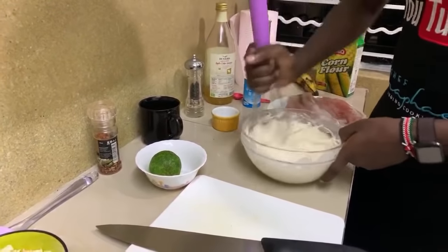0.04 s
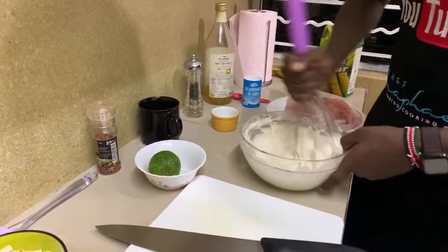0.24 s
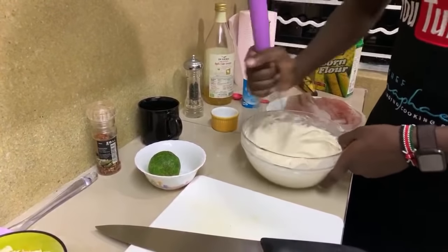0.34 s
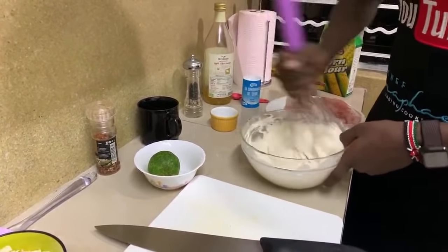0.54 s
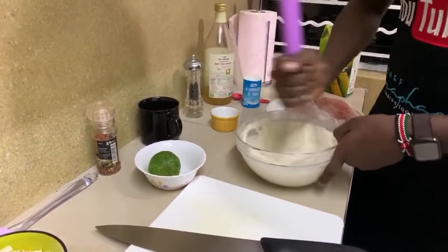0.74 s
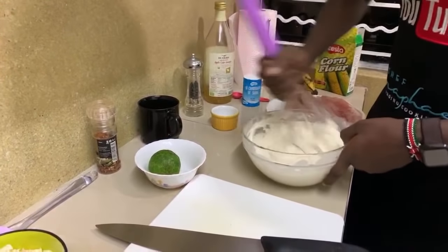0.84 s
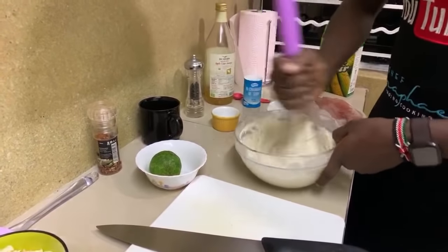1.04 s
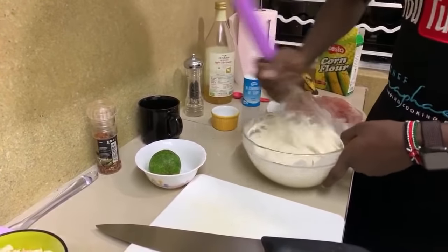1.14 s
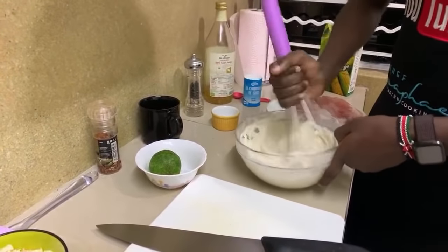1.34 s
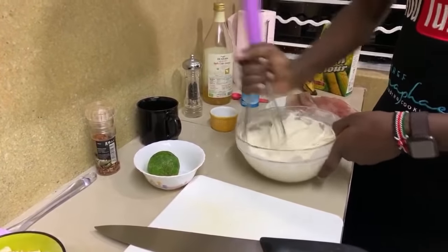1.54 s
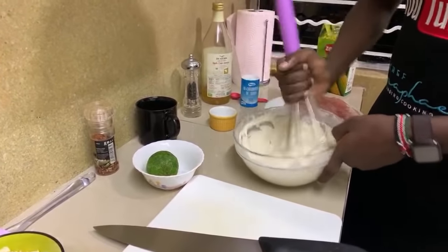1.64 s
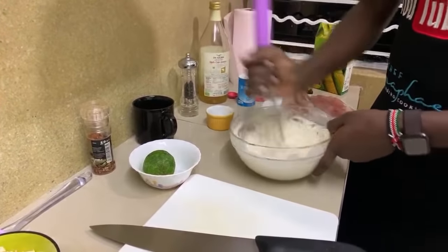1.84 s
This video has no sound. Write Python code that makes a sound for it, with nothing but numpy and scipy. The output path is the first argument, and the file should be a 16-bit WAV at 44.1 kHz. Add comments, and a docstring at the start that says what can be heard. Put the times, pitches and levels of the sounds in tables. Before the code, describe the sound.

Whisking thick batter by hand: wires clink on glass, wet squelches, one hard bowl knock early

```python
"""In a small hard-walled kitchen, close to the microphone, a wire whisk beats thick batter in a glass bowl.
The bowl is held by hand on the counter: it knocks (once hard), bumps and rumbles as pulses, rings and noise.
Wires click and scrape on the glass as damped modes and noisy slips. The batter squelches and crackles as
filtered grains that follow the drag. Short damped snaps make small pops and sharpen some wire clicks.
A few dry ticks, a faint steady background, and the kitchen's echoes and tail complete the place."""
import sys
import numpy as np
from scipy import signal
from scipy.io import wavfile

SR = 44100
rng = np.random.default_rng(int(sys.argv[2]) if len(sys.argv) > 2 else 0)


def unload_audio(sound):
    """Save the sound as a 16-bit wav file, at the path given as the first command line argument."""
    columns = np.transpose(np.atleast_2d(sound))
    # keep every value between -1 and 1, then stretch to whole-number steps
    steps = np.round(np.clip(columns, -1, 1) * 32767)
    wavfile.write(sys.argv[1], SR, steps.astype(np.int16))


N = 83790  # length [samples], 1.9 s
REF_S = 0.01  # a hit at 0 dB has the energy of this many seconds at rms 1


def amp(db):
    """Decibels to gain."""
    return 10 ** (np.asarray(db) / 20)


def read(points, hz):
    """Reads a (frequency, value) table on a log-frequency axis."""
    f, value = np.transpose(points)
    return np.interp(np.log(hz + 1), np.log(f + 1), value)


def evened(x):
    """Scales to rms 1."""
    return x / np.sqrt(np.mean(x ** 2) + 1e-20)


def sized(x):
    """Gives a hit the energy of REF_S seconds at rms 1."""
    return x * np.sqrt(REF_S * SR / (np.sum(x ** 2) + 1e-20))


def add(mix, s, sound):
    """Mixes a sound in at a time in seconds, in place."""
    part = mix[max(round(s * SR), 0):][:len(sound)]
    part += sound[:len(part)]


def pulse(colour, tilt_db=0, size=4096):
    """A minimum-phase pulse with the given spectrum, tilted in dB per octave above 1 kHz."""
    hz = abs(np.fft.fftfreq(size, 1 / SR))
    octaves = np.log2(np.maximum(hz / 1000, 1))
    log_gain = np.log(amp(read(colour, hz) + tilt_db * octaves))
    # The Hilbert transform of the log gain supplies the phase of a causal pulse
    spectrum = np.exp(np.conj(signal.hilbert(log_gain)))
    return np.fft.ifft(spectrum).real[:size // 2]


def through(x, response):
    """Convolves and keeps the length."""
    return signal.fftconvolve(x, response)[:len(x)]


def dying(t, t60):
    """Exponential decay, 60 dB down after t60 seconds."""
    return np.exp(-np.log(1000) * t / t60)


def ring(modes, scatter_db):
    """Sum of damped sines, each made louder or softer by its own scatter."""
    t = np.arange(SR // 2) / SR
    total = np.zeros(len(t))
    for (hz, db, t60), shift_db in zip(modes, scatter_db):
        total += amp(db + shift_db) * dying(t, t60) * np.sin(2 * np.pi * hz * t)
    return sized(total)


def blips(table, rise_s):
    """One damped resonance per row (time, frequency, level, t60), with a soft start."""
    out = np.zeros(N)
    t = np.arange(SR // 2) / SR
    rise = 1 - np.exp(-(t / rise_s) ** 2)
    for s, hz, db, t60 in table:
        tone = rise * dying(t, t60) * np.sin(2 * np.pi * hz * t)
        add(out, s, amp(db) * sized(tone))
    return out


def grains(colour):
    """A dense patter of tiny snaps of uneven size and random sign, coloured and scaled to rms 1."""
    per_second, spread_db = 1400, 5
    sizes = amp(spread_db * np.minimum(rng.exponential(1, N), 4)) * rng.choice([-1, 1], N)
    patter = sizes * (rng.random(N) < per_second / SR)
    return evened(through(patter, pulse(colour)))


def background():
    """Faint steady noise with a fixed spectrum."""
    # Background colour: (frequency [Hz], relative level [dB])
    floor_colour = [(20, -12), (50, -12), (100, -8), (180, -22), (300, -14), (700, -18), (2000, -28.5),
                    (5000, -38), (9000, -46), (15500, -47)]
    level_db = -55
    return amp(level_db) * evened(through(rng.standard_normal(N), pulse(floor_colour)))


def kitchen(x):
    """Echoes off counter and wall, a quick scatter off the jars and a longer tail."""
    # Near surfaces: (delay [s], gain)
    echoes = [(.0016, 0.1), (.0052, 0.05), (.0094, 0.14), (0.0173, 0.14)]
    # Decay of the room's tail: (frequency [Hz], t60 [s])
    tail_t60 = [(120, 0.62), (400, 0.78), (1000, 0.38), (2500, 0.57), (7000, 0.43), (15000, 1)]
    # Colour of the room's tail: (frequency [Hz], relative level [dB])
    tail_colour = [(100, 0), (400, -4), (800, -4), (1300, 9), (2000, 4.5), (3500, 2), (8000, 2),
                   (15000, -2.5)]
    near_db, near_t60_s, near_rise_s = -7.5, 0.098, 0.0032
    tail_db, tail_rise_s = -10, 0.025
    t = np.arange(SR) / SR
    near = rng.standard_normal(SR) * dying(t, near_t60_s) * np.minimum(t / near_rise_s, 1)
    # Each frequency band of the tail dies at its own rate
    hz, times, bands = signal.stft(rng.standard_normal(SR), SR, nperseg=256)
    bands = bands * dying(times, read(tail_t60, hz)[:, None])
    tail = signal.istft(bands, SR, nperseg=256)[1][:SR]
    tail = through(tail, pulse(tail_colour)) * np.minimum(t / tail_rise_s, 1)
    response = amp(near_db) * near / np.linalg.norm(near)
    response += amp(tail_db) * tail / np.linalg.norm(tail)
    for delay, gain in echoes:
        add(response, delay, np.array([gain]))
    return x + through(x, response)


def rumble():
    """The held bowl shifts on the counter in the middle of the beating: low noise that swells and fades."""
    # Loudness of the shifting: (time [s], level [dB])
    shift = [(0, -77), (.9, -64), (.97, -46), (1.04, -45.5), (1.12, -41.5), (1.2, -58), (1.3, -62),
             (1.4, -68), (1.9, -87)]
    # Its colour: (frequency [Hz], relative level [dB])
    rumble_colour = [(20, -37), (45, -2), (65, -3.5), (110, -12), (200, -19), (500, -40), (2000, -67)]
    level = amp(np.interp(np.arange(N) / SR, *np.transpose(shift)))
    return level * evened(through(rng.standard_normal(N), pulse(rumble_colour)))


def bumps():
    """Soft low bumps of the bowl in the hand, each a damped low resonance."""
    # Bumps: (time [s], frequency [Hz], level [dB], t60 [s])
    bump_rows = [(.663, 268, -42, 0.12), (.962, 70, -35, 0.068), (1.0125, 90, -30, 0.036),
                 (1.043, 60.4, -32.5, 0.23), (1.085, 123, -53, 0.023), (1.11, 286, -39.5, 0.23),
                 (1.17, 59, -40.5, 0.061), (1.293, 60.2, -42.5, 0.083), (1.52, 247, -49, .09)]
    return blips(bump_rows, rise_s=0.005)


def knocks():
    """Each knock is a blunt pulse, spread by the counter (treble first), with gritty chatter and a short ring."""
    # Bowl on counter: (time [s], level [dB], treble tilt above 1 kHz [dB per octave])
    knock_rows = [(.005, -49.5, 1.5), (.0298, -42, -15), (.0497, -38.5, -4), (.1810, -37.5, -4),
                  (.2240, -38, 2.5), (.2316, -14.5, 1.5), (.4475, -47.5, 4), (1.076, -39, -2),
                  (1.1275, -43.5, -8), (1.138, -46, 3.5), (1.1445, -51, 2), (1.169, -41, -8),
                  (1.582, -51, -12), (1.716, -55, 1), (1.818, -69, -19), (1.8855, -51.5, 5)]
    # Spectrum of one knock: (frequency [Hz], relative level [dB])
    knock_colour = [(20, -51), (50, -47), (110, -2.5), (240, 1), (380, -0.5), (500, 5), (740, 11),
                    (950, 8.5), (1200, 0.5), (1700, -18.5), (3100, -40.5), (4500, -32), (7000, -45),
                    (15000, -69)]
    # Resonant peaks that give the knock its short ring, some body modes, some from the double hit:
    # (frequency [Hz], relative level [dB], t60 [s])
    ring_peaks = [(118, -11, .3), (243, -14, .2), (316, -6, .22), (449, -9, .2), (511, 2, .17),
                  (559, -3, .18), (620, -7, .14), (762, -1, .22), (1072, -12, .22), (1188, -9, .2),
                  (1588, -12, .2)]
    # Gritty chatter of the glass foot as it lands: (frequency [Hz], relative level [dB])
    chatter_colour = [(40, -73), (300, -33), (900, 0.5), (1700, 10.5), (2500, -1), (3200, -3.5),
                      (4500, -14), (5800, -23), (7800, -28), (10000, -31.5), (15000, -44.5)]
    ring_db, chatter_db, chatter_t60_s = -4.5, -8, 0.055
    rock_s, rock_db = 0.004, -4  # the bowl rocks on its foot at every knock
    bounce_s, bounce_db = 0.01587, -5.5  # the hardest knock bounces once
    low_cut_hz, spread_hz = 65, 2300
    out = np.zeros(N)
    t = np.arange(SR // 8) / SR
    short_ring = ring(ring_peaks, np.zeros(len(ring_peaks)))
    hard_s, hard_db, hard_tilt = max(knock_rows, key=lambda row: row[1])
    bounce = (hard_s + bounce_s, hard_db + bounce_db, hard_tilt)
    for s, db, tilt in knock_rows + [bounce]:
        blow = sized(pulse(knock_colour, tilt))
        chatter = rng.standard_normal(len(t)) * dying(t, chatter_t60_s)
        grit = sized(through(chatter, pulse(chatter_colour, tilt)))
        add(out, s, amp(db) * blow)
        add(out, s + rock_s, amp(db + rock_db) * blow)
        add(out, s, amp(db + ring_db) * short_ring)
        add(out, s, amp(db + chatter_db + tilt) * grit)  # a brighter knock is also grittier
    out = signal.sosfilt(signal.butter(2, low_cut_hz, "high", fs=SR, output="sos"), out)
    # An allpass delays the low part more than the treble
    lag = np.exp(-2 * np.pi * spread_hz / SR)
    return signal.lfilter([-lag, 1], [1, -lag], out)


def ticks():
    """Small dry ticks, each a very short damped resonance."""
    # Ticks: (time [s], frequency [Hz], level [dB], t60 [s])
    tick_rows = [(.1958, 10700, -57.5, 0.0093), (.1962, 4440, -55.5, 0.006), (.2011, 3330, -42.5, .002),
                 (.2012, 4700, -44, 0.0011), (1.5607, 8520, -51, 0.0018), (1.5608, 12500, -56.5, 0.00043)]
    return blips(tick_rows, rise_s=0.00039)


def scrapes():
    """A wire dragged along the glass swells and fades as a run of tiny slips."""
    # Scrapes: (time [s], length [s], level [dB])
    scrape_rows = [(0.918, .12, -56), (1.61, 0.036, -76), (1.771, 0.042, -49.5), (1.814, 0.076, -62)]
    # Their colour: (frequency [Hz], relative level [dB])
    scrape_colour = [(500, 8), (1400, 9), (2500, 0), (3600, 4), (4600, 3.5), (6000, -20), (8500, -35),
                     (15000, -28)]
    level = np.zeros(N)
    for s, length, db in scrape_rows:
        swell = np.sqrt(np.hanning(round(length * SR)) + 1e-12)
        add(level, s, amp(db) * swell)
    return level * grains(scrape_colour)


def snaps():
    """Small pops and the sharp first strike of some wire clicks, each a short damped resonance."""
    # Short damped snaps: (time [s], frequency [Hz], level [dB], t60 [s])
    snap_rows = [(.0975, 3200, -60, 0.005), (.6065, 4960, -84, .001), (.7643, 1176, -44.5, 0.014),
                 (1.096, 2660, -57, 0.0041), (1.0962, 6300, -58, 0.00037), (1.4862, 1240, -48.5, 0.004),
                 (1.5158, 1110, -48, 0.0051), (1.7793, 1136, -57, 0.0013), (1.818, 746, -40, 0.014)]
    return blips(snap_rows, rise_s=0.00019)


def batter():
    """Dull squelch and fine crackle both follow the drag of the whisk, the crackle less strongly."""
    # How hard the whisk drags through the batter: (time [s], squelch level [dB])
    drag_curve = [(0, -39), (.06, -44), (.14, -68.5), (.2, -44), (0.399, -43), (0.562, -72), (.67, -56),
                  (.78, -60), (.9, -52.5), (.99, -54.5), (1.13, -46), (1.25, -67.5), (1.34, -53),
                  (1.519, -62), (1.68, -70), (1.751, -59), (1.812, -54), (1.9, -50)]
    # Colour of the squelch: (frequency [Hz], relative level [dB])
    squelch_colour = [(20, -27), (60, -18), (170, -0.5), (270, 8), (380, -3), (520, 4), (800, -1),
                      (1300, -1.5), (2000, -13), (4000, -23.5), (8000, -34.5), (15000, -40)]
    # Colour of the crackle: (frequency [Hz], relative level [dB])
    crackle_colour = [(1000, -17), (2800, 34), (5000, -46), (7500, 11), (8700, 23.5), (12000, -5),
                      (16000, -64)]
    drag_ref_db, crackle_db = -50, -72.5  # crackle level when the drag is at its reference
    crackle_follow = 0.28  # dB of crackle per dB of drag
    drag_db = np.interp(np.arange(N) / SR, *np.transpose(drag_curve))
    squelch = amp(drag_db) * grains(squelch_colour)
    crackle_level = amp(crackle_db + crackle_follow * (drag_db - drag_ref_db))
    return squelch + crackle_level * grains(crackle_colour)


def wires():
    """A wire lands, rasps for a few milliseconds and rings the glass; the moving batter detunes each ring."""
    # Wires striking the glass: (time [s], level of the low part [dB], level of the bright part [dB])
    clicks = [(.379, -41.5, -54), (0.5114, -44.5, -64.5), (0.5904, -40.5, -50), (0.644, -45.5, -57),
              (0.6738, -50, -54.5), (.719, -41.5, -54), (.8093, -45, -55.5), (0.8744, -34.5, -45),
              (0.93, -41.5, -46), (0.9352, -45, -47), (0.967, -37, -36), (1.0004, -37, -42.5),
              (1.053, -50, -57), (1.2829, -43.5, -53.5), (1.318, -43, -45), (1.3212, -41.5, -68),
              (1.381, -56, -73), (1.3946, -44.5, -55), (1.429, -52, -51), (1.4347, -38.5, -48.5),
              (1.486, -47, -57.5), (1.5153, -46.5, -52.5), (1.5895, -44, -57), (1.628, -48, -67),
              (1.739, -42, -51.5), (1.7517, -69, -58), (1.779, -42, -55.5), (1.792, -53.5, -64),
              (1.8082, -48.5, -51), (1.8475, -73, -54.5), (1.855, -41.5, -54.5)]
    # Low modes of the bowl, damped by the batter: (frequency [Hz], relative level [dB], t60 [s])
    low_modes = [(515, 3, .14), (780, -7, .045), (885, -5, .04), (1290, -6, .035), (1604, -8, .035)]
    # Upper modes of the bowl: (frequency [Hz], relative level [dB], t60 [s])
    bright_modes = [(2400, 0, .045), (3680, 0, .045), (5130, -2, .05), (6650, -2, .03), (8450, -5, .022),
                    (10200, -9, .015), (12100, -10, .015)]
    # Rasp of a wire sliding over the glass, low part: (frequency [Hz], relative level [dB])
    low_rasp = [(100, 0.5), (330, -6.5), (550, 2), (850, 5), (1500, 0.5), (2200, -12), (5000, -32)]
    # Bright part of the rasp: (frequency [Hz], relative level [dB])
    bright_rasp = [(1000, -41), (2200, 10), (3700, 6.5), (5800, -1), (7600, 0), (8700, 1), (12000, -10),
                   (16000, -27)]
    low_ring_db, bright_ring_db, low_rasp_db, bright_rasp_db = -3, -8, -6.5, -6
    detune, mode_scatter_db = 0.012, 2.5  # standard deviations: share of frequency, level by place of blow
    contact_t60_s = 0.02
    out = np.zeros(N)
    t = np.arange(SR // 10) / SR
    low_pulse, bright_pulse = pulse(low_rasp), pulse(bright_rasp)
    for s, low_db, bright_db in clicks:
        low = (low_db, low_modes, low_ring_db, low_pulse, low_rasp_db)
        bright = (bright_db, bright_modes, bright_ring_db, bright_pulse, bright_rasp_db)
        for db, modes, ring_db, colour, rasp_db in (low, bright):
            slips = rng.standard_normal(len(t)) * rng.exponential(1, len(t))
            slips = slips * dying(t, contact_t60_s)
            loaded = [(hz * (1 + detune * rng.standard_normal()), level, t60) for hz, level, t60 in modes]
            scatter_db = mode_scatter_db * rng.standard_normal(len(modes))
            add(out, s, amp(db + rasp_db) * sized(through(slips, colour)))
            add(out, s, amp(db + ring_db) * ring(loaded, scatter_db))
    return out


def scene():
    """The whisking in the kitchen over a faint steady background; background and rumble get no echo."""
    tick_room = 0.45  # share of the ticks that the kitchen answers
    bowl = knocks() + wires() + scrapes() + batter() + snaps() + bumps()
    dry_ticks = ticks()
    in_room = kitchen(bowl + tick_room * dry_ticks)
    mix = in_room + (1 - tick_room) * dry_ticks + background() + rumble()
    return mix[None]


def record(dry):
    """Full-scale clipping, then a steep band limit."""
    edge_hz = 16200
    lowpass = signal.firwin(511, edge_hz, window=("kaiser", 9), fs=SR)
    return signal.oaconvolve(np.clip(dry, -1, 1), lowpass[None], "same")


dry = scene()
out = record(dry)
unload_audio(out)
```